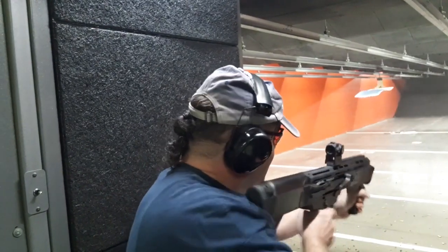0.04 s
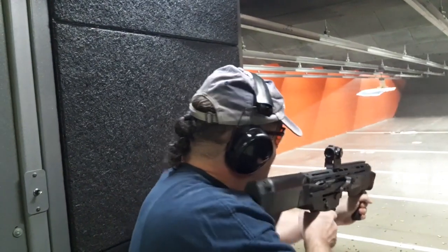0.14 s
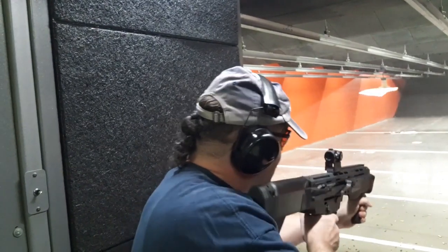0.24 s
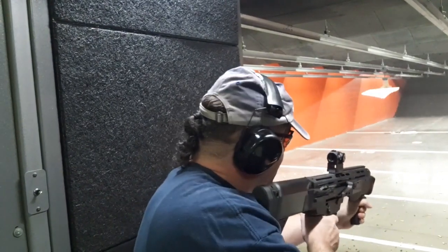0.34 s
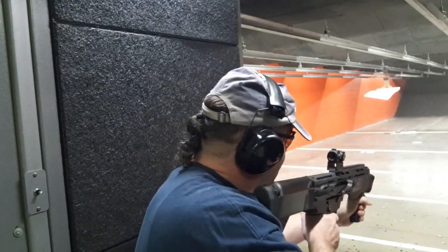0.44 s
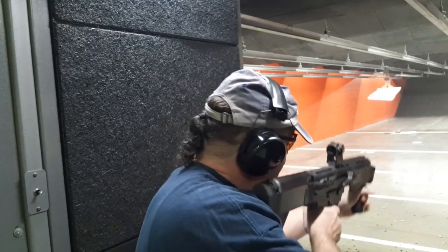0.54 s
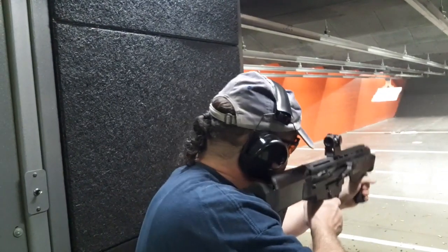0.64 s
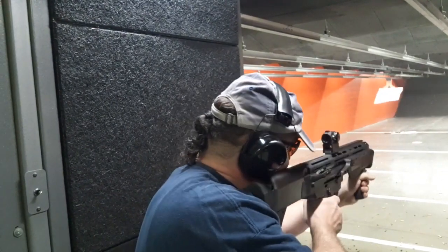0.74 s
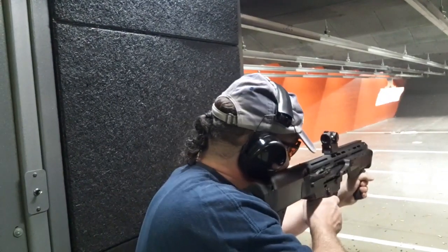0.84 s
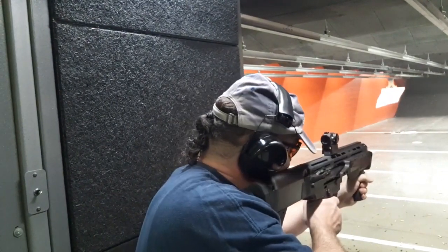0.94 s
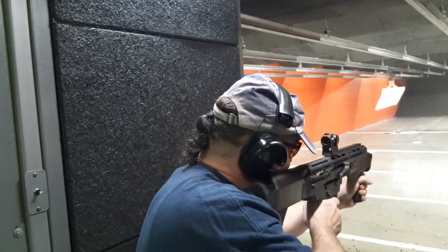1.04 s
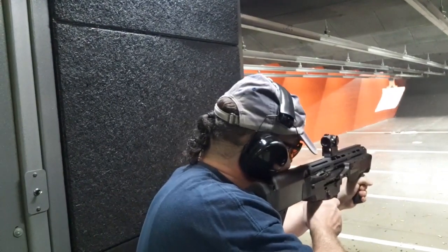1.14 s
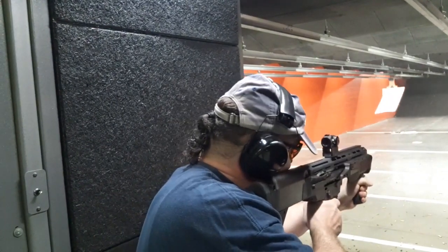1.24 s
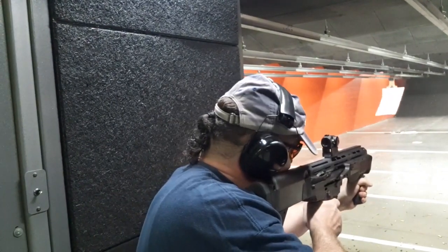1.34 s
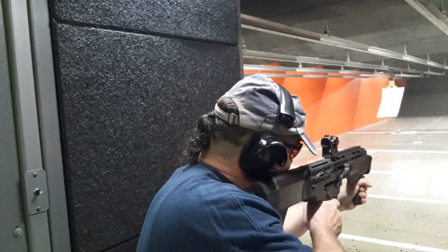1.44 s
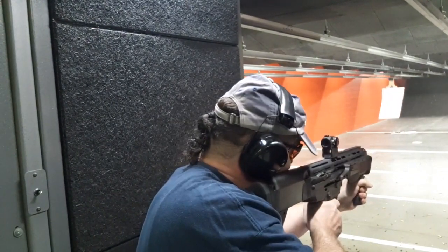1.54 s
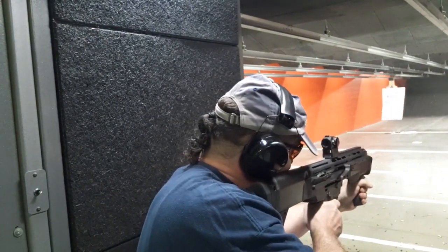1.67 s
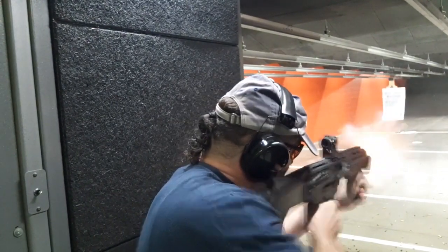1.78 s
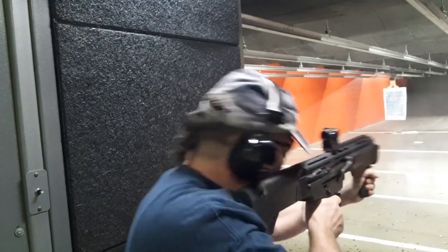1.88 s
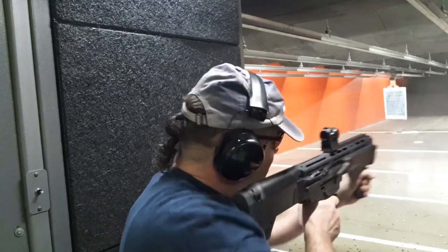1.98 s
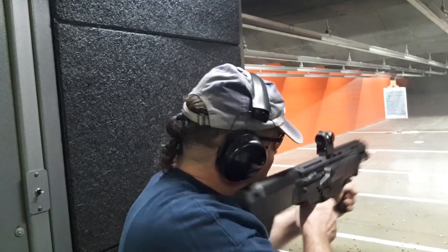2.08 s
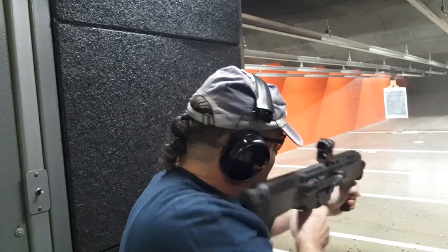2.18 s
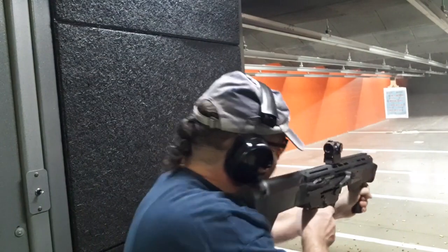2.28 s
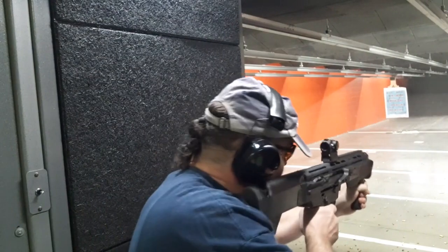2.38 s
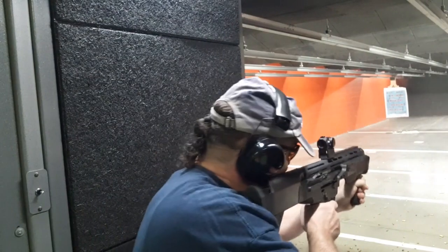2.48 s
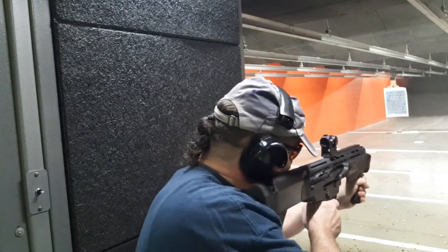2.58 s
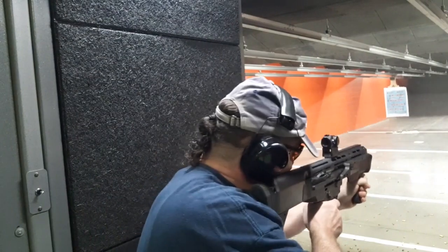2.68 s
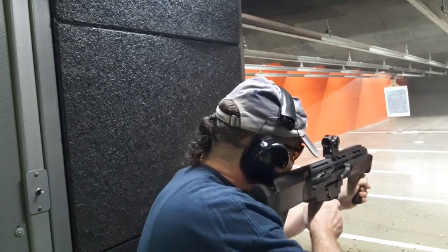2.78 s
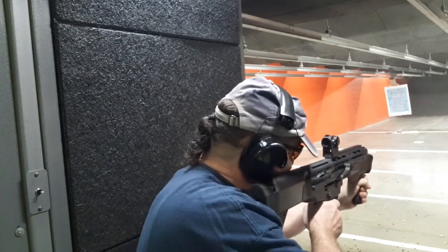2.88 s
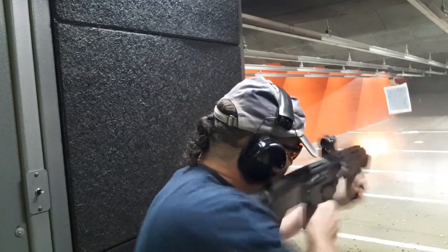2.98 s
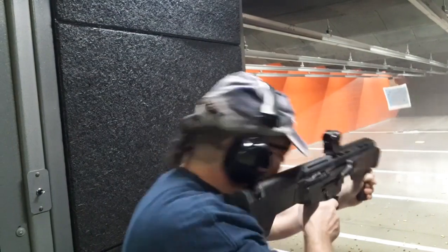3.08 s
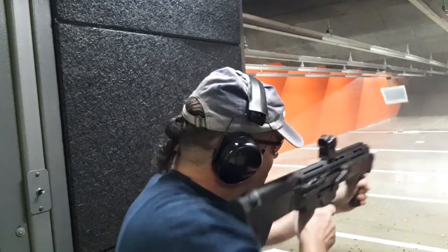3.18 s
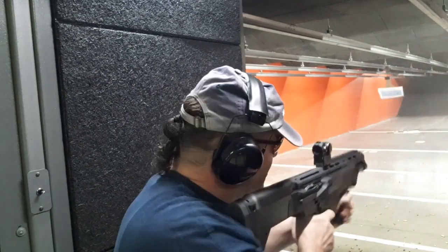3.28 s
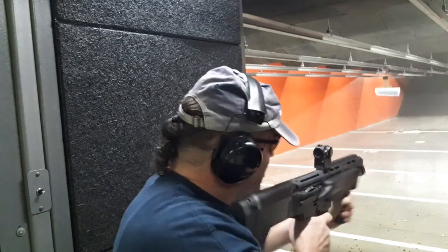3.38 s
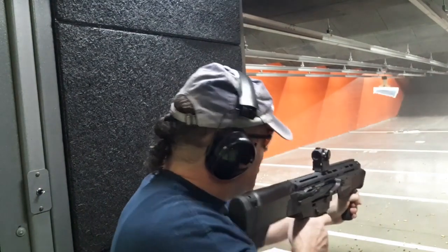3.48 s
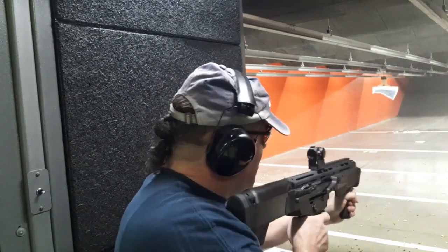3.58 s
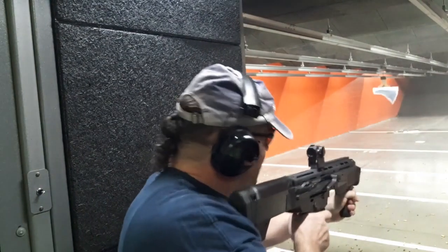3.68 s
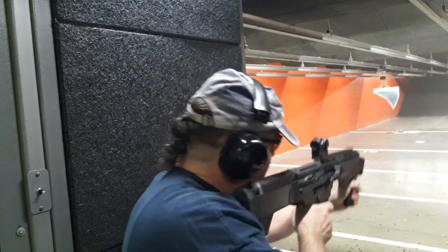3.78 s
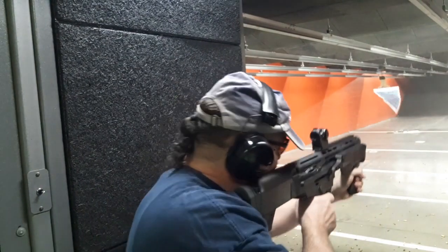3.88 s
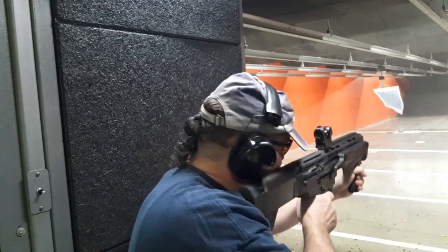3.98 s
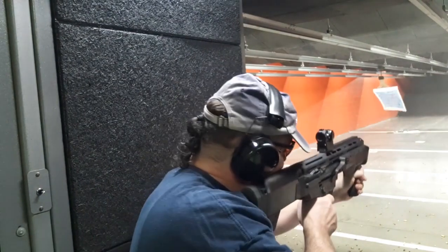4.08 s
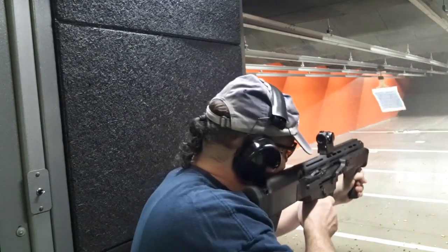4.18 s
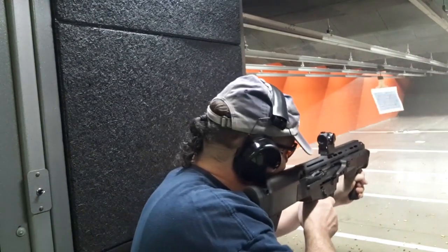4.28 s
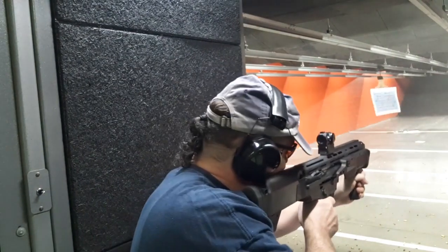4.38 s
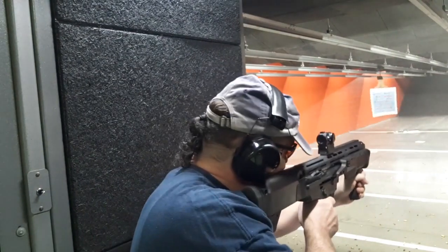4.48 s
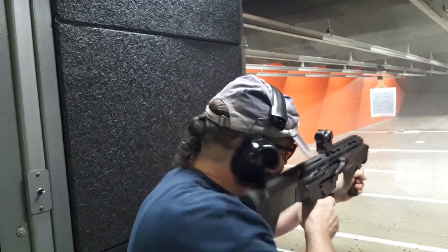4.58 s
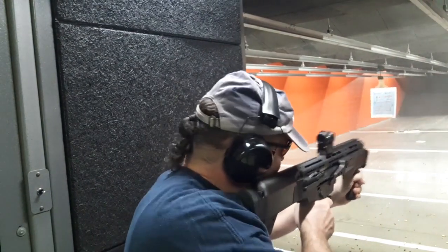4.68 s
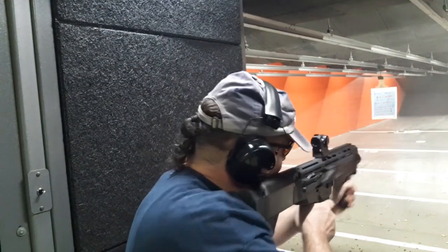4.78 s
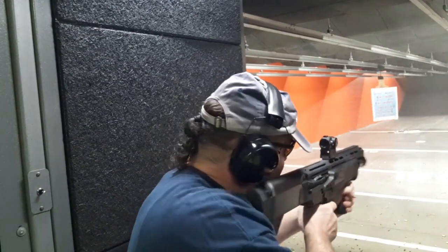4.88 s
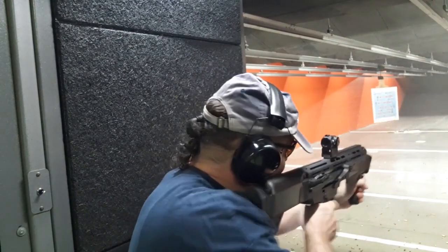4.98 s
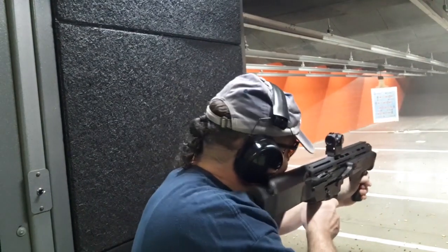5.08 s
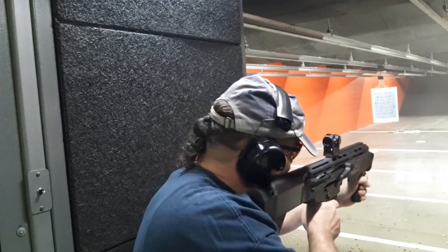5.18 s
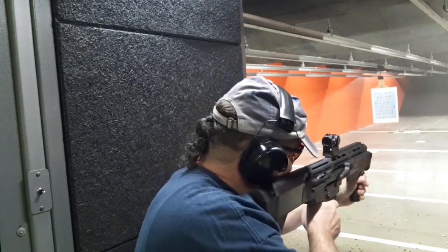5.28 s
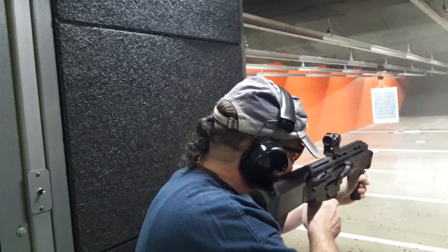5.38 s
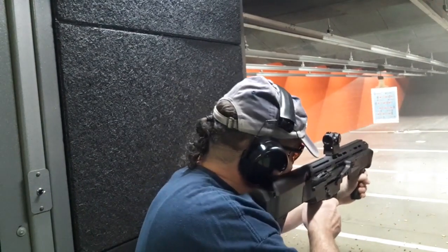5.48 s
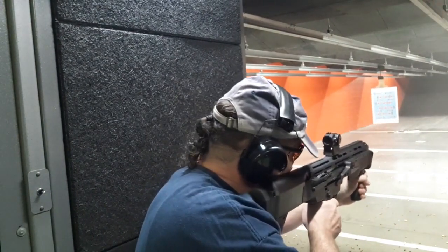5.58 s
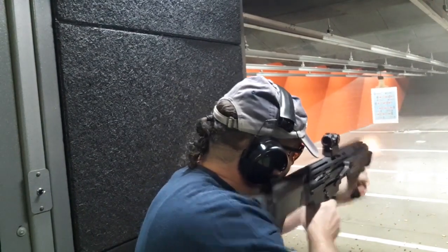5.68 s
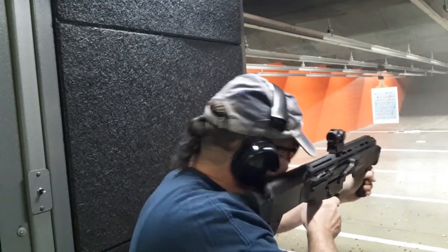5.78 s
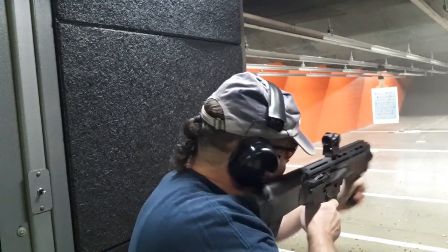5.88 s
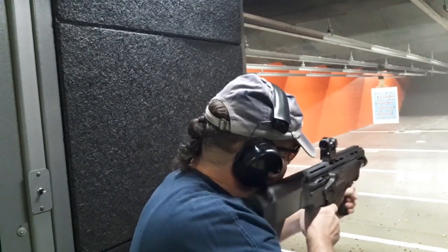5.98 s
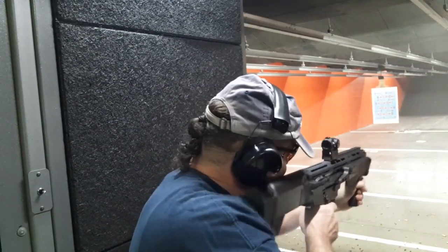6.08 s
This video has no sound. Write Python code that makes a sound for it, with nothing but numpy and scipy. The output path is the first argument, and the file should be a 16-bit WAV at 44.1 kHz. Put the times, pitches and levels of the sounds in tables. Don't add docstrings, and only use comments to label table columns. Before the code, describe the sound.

Four heavy shotgun blasts fill a concrete hall after a neighbouring shot, separated by sharp metallic pump clacks, ringing shell bounces and ventilation hum.

```python
import sys
import numpy as np
from scipy import signal
from scipy.io import wavfile
from scipy.ndimage import uniform_filter1d

SR = 44100
rng = np.random.default_rng(int(sys.argv[2]) if len(sys.argv) > 2 else 0)


def natural_amplitude(level_db):
    exponent = np.asarray(level_db, float) / 20
    return 10 ** exponent


def digitize_waveform(pressure):
    field = np.atleast_2d(pressure).T
    bounded = np.clip(field, -1, 1)
    quanta = np.round(bounded * 32767).astype(np.int16)
    wavfile.write(sys.argv[1], SR, quanta)


N = 270419

# (time [s], blast [dB], boom near 130 Hz [dB], body near 520 Hz [dB], bench echo [dB])
SHOTS = [
    (1.8774, 21.5, 3.5, 0, -0.7),
    (3.0767, 21, 4, 1, 0.1),
    (4.636, 15, 3, 3.5, 6.5),
    (5.776, 14.5, 4, 2, 6),
]
# (blast [dB], boom [dB], body [dB], bench echo [dB], decay time factor [x])
NEXT_LANE = (16.5, -1.5, 8, -1, 0.9331)
EARLIER_SHOT = (14, -1, 3, 0.6, 1.16)
# (frequency [Hz], level [dB])
BLAST_TONE = [(30, -38), (60, -21.5), (120, 0.5), (250, 1.5), (550, 0), (1200, 0.5), (2500, -6),
              (5500, -5.5), (9000, -10.5), (16000, -6)]
# (frequency [Hz], t60 [s])
HALL_DECAY = [(40, 1.3), (120, 1.25), (300, 0.78), (1000, 0.73), (3000, 0.76), (6000, 0.72), (9000, 0.54),
              (16000, 0.4)]
# (frequency [Hz], t60 [s], level [dB])
FAR_END = [(60, 6.9, -19.5), (250, 0.89, -37), (1000, 2.9, -33), (4000, 2.1, -31.5), (9000, 0.88, -38.5)]
# (frequency [Hz], boost [dB])
ROOM_MODES = [(114, 4.5), (140, 4), (203, 2), (263, 2), (585, 3)]
# (slide hits rear stop [s], new shell fed [s], bolt locks [s], effort [dB])
RACKS = [
    (0.0014, 0.1030, 0.1305, -3),
    (2.1418, 2.2478, 2.2772, 0),
    (3.3777, 3.507, 3.5246, -1.5),
    (4.9097, 5.0517, 5.0706, 0),
    (6.0172, 6.113, 6.2, -2),
]
# (time [s], peak [dB])
RUBS = [(0.0438, -13), (0.1415, -14), (1.841, -33), (3.4237, -17), (4.6, -41), (4.853, -14.5),
        (5.9634, -15.5)]
# (time [s], peak [dB])
KNOCKS = [(0.0505, -13)]
# (peak [dB], low knock [dB], treble [dB], rattle length [s])
HAMMER = (-15, -6, -13, 0.03)
# (frequency [Hz], width [Hz], level [dB])
STEEL_MODES = [(850, 470, -7), (2375, 280, -14), (4190, 520, -6), (4900, 440, -3.5), (5826, 400, 2)]
# (time [s], peak [dB], brass ring [Hz], hollow tube [dB], treble [dB])
SHELLS = [(0.6894, -38.5, 4750, 6, -17), (0.8288, -20.5, 4640, -17, -28), (0.9147, -27, 4600, -36, -38),
          (0.9704, -33.5, 4600, -22, -44), (1.058, -52, 4640, -20, -39), (1.2264, -53, 4620, -20, -40),
          (1.2502, -53, 4600, -20, -33), (2.7229, -37, 4940, 0, -16), (2.7369, -18, 4700, -15, -30),
          (2.9326, -16, 4830, -13, -40), (3.034, -25.5, 5000, -16, -24.5), (3.7523, -7, 4430, -14, -13.5),
          (4.2138, -12, 6300, -6, -20.5), (4.4378, -37, 6040, 8.5, -33), (4.5403, -30, 4730, -27, -35),
          (5.1802, -11, 4800, -30, -13), (5.656, -12, 5615, -58, -23), (5.7324, -47, 5800, -10, -10)]
# (first landing [s], level [dB])
HULLS = [(0, -21), (2.7, -15), (3.7, -31), (5.1, -13)]
# (delay [s], level [dB])
WALLS = [(.004, -26), (.008, -27), (.0145, -22)]
# (frequency [Hz], level [dB])
SQUEAK_LINES = [(2842, -65.5), (7800, -69.5), (12505, -63.5)]
# (frequency [Hz], level per Hz [dB])
AIR_TONE = [(25, -24), (60, -4), (120, 2.5), (250, -4), (550, -5), (1200, -13.5), (2500, -17),
            (5500, -23.5), (7500, -41.5), (15000, -51)]
# (time [s], level [dB])
AIR_LEVEL = [(0, -58), (1.45, -58), (1.8, -52), (4.3, -55), (6.14, -54)]
# (frequency [Hz], likeness [0-1])
LIKENESS = [(60, 0.45), (250, .85), (600, .4), (8000, .3)]
# (frequency [Hz], gain [dB])
OPEN_MIC = [(30, -8.5), (100, 5), (5000, 0.5), (6300, 2.5), (7600, -6), (9500, -4), (12000, -3),
            (15500, -7)]
# (frequency [Hz], gain [dB])
AFTER_OVERLOAD = [(30, -12), (52, -1), (100, -1.5), (5500, -1), (7600, -8), (12000, -2), (16000, -6.5)]
# (frequency [Hz], gain [dB])
COVERED_MIC = [(30, -32), (70, -27), (160, -25), (300, -33), (550, -41), (1200, -38), (2200, -35),
               (5200, -35), (6000, -54), (7700, -66), (10000, -51), (15500, -57)]

# (peak [dB], low knock [dB], treble [dB], rattle length [s])
REAR_STOP, FEED, LOCK = (-5.5, -15, -15.5, .015), (-14, -17, -16, .02), (-3, -15, -19, .012)
RUB, KNOCK = (0, -12, -20, .014), (0, 2, -25, .012)
SLIDE = (-22, -22, -14, .04)

HOP = 128
HZ = np.fft.rfftfreq(512, 1 / SR)


def evened(x):
    return x / np.sqrt(np.mean(x ** 2) + 1e-20)


def read(points, hz, column=1):
    table = np.transpose(points)
    return np.interp(np.log(hz + 1), np.log(table[0] + 1), table[column])


def add(mix, s, sound):
    part = mix[..., round(s * SR):][..., :sound.shape[-1]]
    part += sound[..., :part.shape[-1]]


def colour(x, points):
    size = 4096
    gain = np.log(natural_amplitude(read(points, abs(np.fft.fftfreq(size, 1 / SR)))))
    taps = np.fft.ifft(np.exp(gain - 1j * signal.hilbert(gain).imag)).real
    return signal.oaconvolve(x, taps[:size // 2])[:len(x)]


def ring(x, hz, width):
    r = np.exp(-np.pi * width / SR)
    return 2 * signal.lfilter([1 - r], [1, -r * np.exp(2j * np.pi * hz / SR)], x).real


def bump(centre_hz, octaves):
    return np.exp(-.5 * (np.log2((HZ + 1) / centre_hz) / octaves) ** 2)


def frame_times(length):
    return np.arange(length // HOP + 5) * HOP / SR


def field(gain, length):
    a, b, c, d = rng.standard_normal((gain.shape[1], len(HZ), 4)).T
    same = np.clip(read(LIKENESS, HZ), 0, 1)[:, None]
    left = a + 1j * b
    right = same * left + np.sqrt(1 - same ** 2) * (c + 1j * d)
    z = np.array([left, right])
    return signal.istft(z * gain, nperseg=512, noverlap=512 - HOP)[1][:, :length] / 20


def shot(blast_db, boom_db, body_db, comb_db, slow=0.99, early=1.9, treble_db=0.86):
    length = int(2.5 * SR)
    t = frame_times(length)
    tone_db = read(BLAST_TONE, HZ) + boom_db * bump(130, 0.99) + body_db * bump(520, 0.48)
    tone_db += treble_db * bump(7000, 1.3)
    tone_db += comb_db * np.cos(2 * np.pi * (HZ + 120) / 675) * bump(480, 1.5)

    held_back = np.clip(1.2 * bump(70, 0.8) + 0.6 * bump(560, 0.6), 0, 1)[:, None]
    gathering = 1 - held_back * np.exp(-(t / .075) ** 2)
    near = natural_amplitude(-60 * t / (slow * read(HALL_DECAY, HZ)[:, None])) * gathering
    far = natural_amplitude(read(FAR_END, HZ, column=2)[:, None] - 60 * t / read(FAR_END, HZ)[:, None])

    booth_tone = 1 + 1.58 * bump(4700, 0.85) + (2.4 - .3 * comb_db) * bump(240, 0.7)
    booth = 1 + early * np.exp(-t / 0.034) * booth_tone[:, None]
    hall = field(natural_amplitude(tone_db)[:, None] * np.hypot(near * booth, far), length)
    hall = 0.97 * hall + sum((natural_amplitude(db) - 1) * ring(hall, hz, 14) for hz, db in ROOM_MODES)
    s = np.arange(length) / SR
    hall = hall * (1 - np.exp(-s / .001))
    wave = (1 - s / .0015) * np.exp(-s / .0015)
    return natural_amplitude(blast_db) * (hall + natural_amplitude(-8.5) * early * wave)


def clack(peak_db, knock_db, treble_db, length):
    t = np.arange(int(.3 * SR)) / SR
    knock_db, treble_db = min(knock_db, 4), min(treble_db, -14)
    uneven = natural_amplitude(3.52 * np.minimum(rng.exponential(1, len(t)), 5))
    chatter = rng.standard_normal(len(t)) * uneven
    chatter *= 1 - np.exp(-t / (0.14 * length))
    chatter *= np.exp(-(t / length) ** 0.96) + natural_amplitude(-13) * np.exp(-t / 0.045)
    body = 0.79 * chatter
    for hz, width, db in STEEL_MODES:
        body = body + natural_amplitude(db) * ring(chatter, hz * rng.uniform(0.947, 1.06), width)
    tone = [(150, knock_db - 10.5), (600, knock_db + 6), (2500, 0.023), (6500, 0.011), (9000, treble_db + 16)]
    sound = colour(body, tone)
    return natural_amplitude(peak_db + 13.5) * sound / abs(sound).max()


def action():
    out = np.zeros(N)
    for *times, effort_db in RACKS:
        for s, kind in zip(times, (REAR_STOP, FEED, LOCK)):
            add(out, s, natural_amplitude(effort_db) * clack(*kind))
    for rows, kind in ((RUBS, RUB), (KNOCKS, KNOCK)):
        for s, peak_db in rows:
            add(out, s, natural_amplitude(peak_db) * clack(*kind))
    return out


def slide():
    out = np.zeros(N)
    for rear, _, _, effort_db in RACKS:
        add(out, rear + .02, natural_amplitude(effort_db) * clack(*SLIDE))
    return out


def shell(hull_db, peak_db, hz, tube_db, treble_db):
    t = np.arange(int(.35 * SR)) / SR
    tube_hz = 1351
    snap_db = min(23 + .3 * tube_db + .5 * treble_db, 11)
    tick = (t == 0) + 0.24 * rng.standard_normal(len(t)) * np.exp(-t / 0.00081)

    def mode(f, t60):
        return evened(ring(tick, f, 2.2 / t60))

    brass = mode(hz, .018) + natural_amplitude(-12 - snap_db) * mode(hz, .07)
    brass += .5 * mode(1.08 * hz, .025) + natural_amplitude(min(tube_db + 1, -5)) * mode(.69 * hz, .03)
    under_db = hull_db + 1.5 * snap_db
    snap = colour(tick, [(800, under_db - 16), (2000, under_db), (.75 * hz, under_db / 3.1),
                         (hz, 0), (1.3 * hz, -2), (9000, 1.2 * treble_db + 11)])
    tube = ring(mode(tube_hz, 0.028), tube_hz, 300)
    dry = evened(brass) + natural_amplitude(snap_db) * evened(snap) + natural_amplitude(tube_db + 5) * evened(tube)
    dry += natural_amplitude(1.8 * hull_db + 7 + .7 * snap_db) * mode(2110, .06)

    scatter = natural_amplitude(-28.5 - 60 * t / .11) + natural_amplitude(-42 - 60 * t / .35)
    scatter += sum(natural_amplitude(db) * (t > s) * np.exp(-abs(t - s) / 0.00049) for s, db in WALLS)
    echo = scatter * rng.standard_normal(len(t))
    echo[0] = 1
    sound = signal.oaconvolve(dry, echo)[:len(t)]
    return natural_amplitude(peak_db + 10.5) * sound / abs(sound).max()


def squeak():
    start_s, rise_s, hold_s, fall_db_per_s = 1.66, .035, .12, 300
    t = np.arange(N) / SR - start_s
    fall_db = fall_db_per_s * np.maximum(t - rise_s - hold_s, 0)
    level = np.clip(t / rise_s, 0, 1) ** 2 * natural_amplitude(2 - fall_db)
    lines = sum(natural_amplitude(db + 2) * evened(ring(rng.standard_normal(N), hz, 25)) for hz, db in SQUEAK_LINES)
    return level * lines


def ventilation():
    tone = natural_amplitude(read(AIR_TONE, HZ) - read(OPEN_MIC, HZ))
    air = field(tone[:, None] * np.ones(len(frame_times(N))), N)
    s, db = np.transpose(AIR_LEVEL)
    return natural_amplitude(np.interp(np.arange(N) / SR, s, db) + 5) * evened(air)


def scene():
    hall, gun, floor = ventilation(), squeak() + action() + slide(), np.zeros(N)
    add(hall, 0, shot(*EARLIER_SHOT)[:, SR * 9 // 20:])
    add(hall, .2285, shot(*NEXT_LANE, early=0.58, treble_db=-2.5))
    for s, *row in SHOTS:
        add(hall, s, shot(*row))
        add(gun, s - 1 / 100, clack(*HAMMER))
    for s, *row in SHELLS:
        hull_db = [db for first, db in HULLS if first <= s][-1]
        add(floor, s, shell(hull_db, *row))
    return hall + gun * natural_amplitude([[0], [-3]]) + floor * natural_amplitude([[0], [-8]])


def roll_off(x):
    return signal.sosfilt(signal.butter(12, 15800, fs=SR, output="sos"), x)


def record(dry):
    left = colour(dry[0], OPEN_MIC)
    strain = uniform_filter1d(np.minimum(abs(left), 6.0), size=2000)
    bass = signal.lfilter(*signal.butter(1, 300, fs=SR), left)
    left = left - bass * strain ** 2 / (strain ** 2 + 0.99)
    left = 1.03 * left / (1 + abs(left) ** 7.0) ** (1 / 5.65)
    left = np.clip(colour(left, AFTER_OVERLOAD), -1, 1)
    right = np.pad(colour(dry[1], COVERED_MIC), (46, 0))[:N]
    return roll_off(np.array([left, right]))


dry = scene()
out = record(dry)
digitize_waveform(out)
```